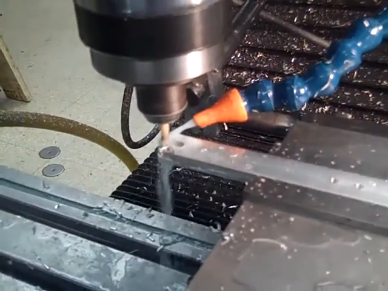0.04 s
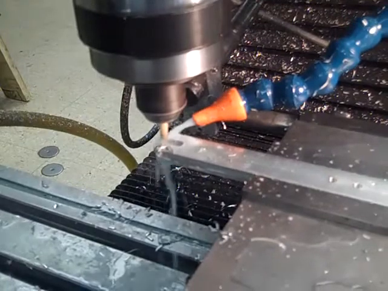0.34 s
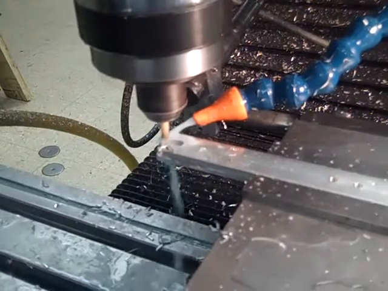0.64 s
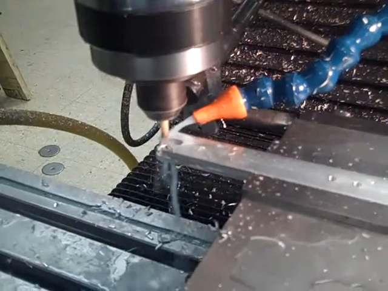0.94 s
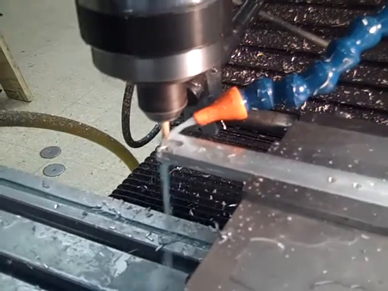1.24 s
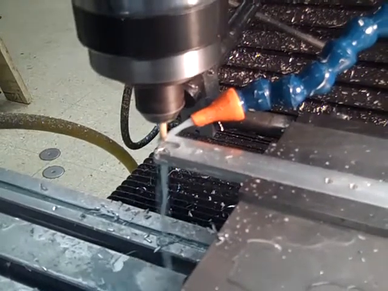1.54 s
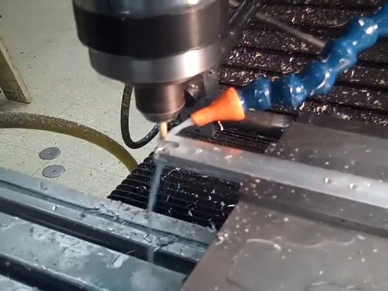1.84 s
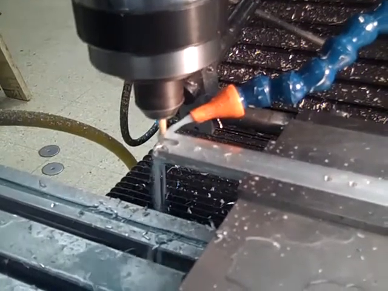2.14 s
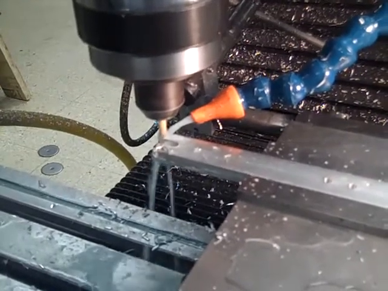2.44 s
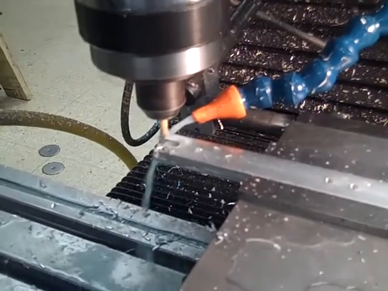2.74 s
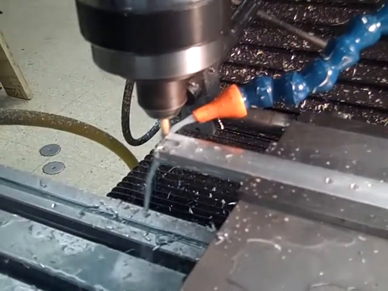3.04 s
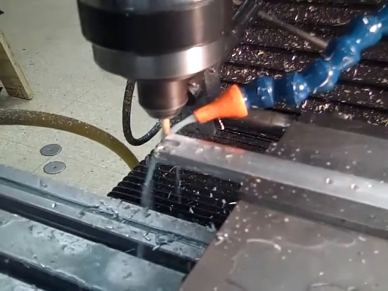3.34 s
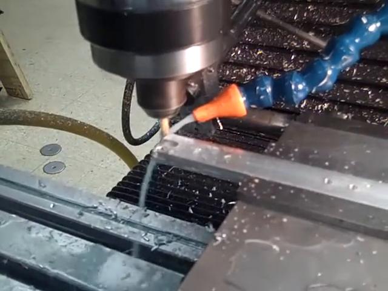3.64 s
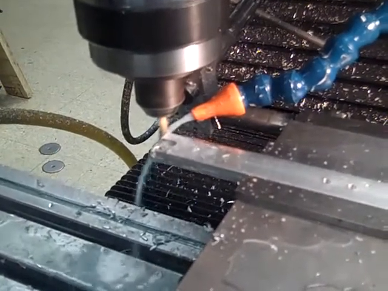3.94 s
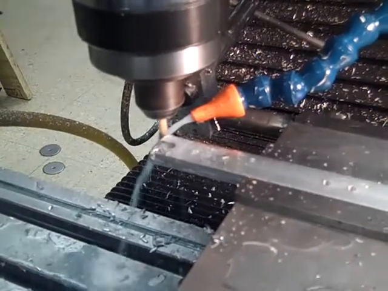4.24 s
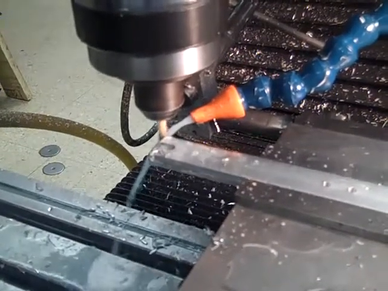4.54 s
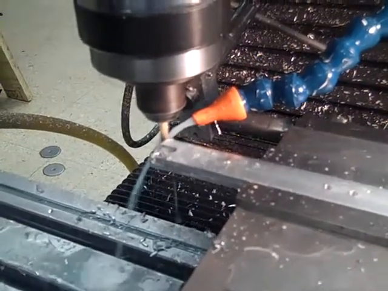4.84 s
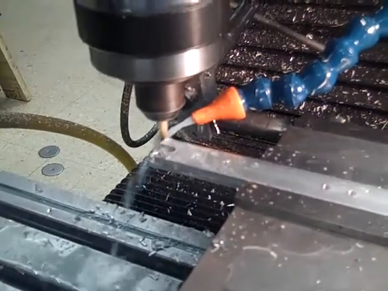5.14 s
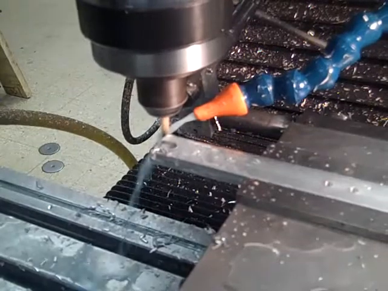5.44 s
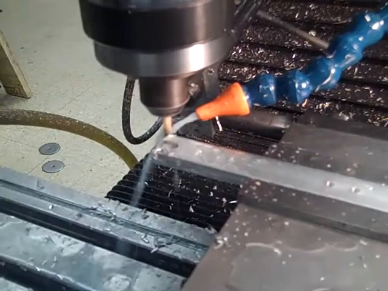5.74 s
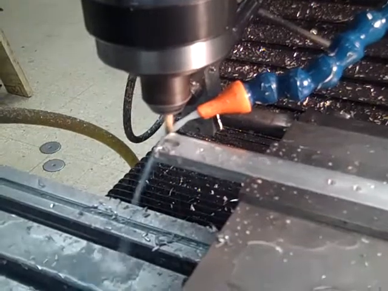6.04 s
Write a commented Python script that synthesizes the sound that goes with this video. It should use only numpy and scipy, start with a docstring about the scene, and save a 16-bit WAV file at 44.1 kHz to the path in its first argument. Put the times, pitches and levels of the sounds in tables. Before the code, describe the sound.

From the start, a milling machine is heard close by, cutting a metal bar. The cutter makes a rapid, chattering stream of very short, shrill squeaks, uneven in strength, with sharper ones poking out. A coolant jet gives a constant high hiss with a fine spatter. Beneath it the drive rumbles and hums, with a mid-pitched whine that throbs quickly and swells gently.

The squeaking is strong in the first half second, eases briefly near 0.9 and 2.3 seconds, and has another strong run from about 3.5 to 4.1 seconds. The machine noise dips slightly under the loudest squeaks and rises in each lull. Between about 4.2 and 4.6 seconds the squeaks fade out as the cutter runs clear. Hiss, rumble and whine continue steadily until the end at about 6 seconds. Squeaks and hiss have a short, tight echo and are brighter on the left.

```python
"""A milling machine cuts an aluminium bar with a two-flute cutter under a jet of coolant.
The flutes (cutting edges) squeak as they bite, once or twice a turn, and run clear after four seconds.
The jet hisses on the spinning tool; the drive rumbles and whines, throbbing with each lap of its belt.
The squeaks push an automatic volume control down, so the steady machine swells whenever the cut eases."""
import sys
import numpy as np
from scipy import signal
from scipy.fft import rfft, irfft, next_fast_len
from scipy.io import wavfile
from scipy.ndimage import uniform_filter1d

SR = 44100
rng = np.random.default_rng(int(sys.argv[2]) if len(sys.argv) > 2 else 0)


def generate_wav(signal):
    """Clip the signal to [-1, 1] and save it as 16-bit WAV at the path in sys.argv[1]."""
    frames = np.transpose(np.atleast_2d(signal))
    scaled = np.clip(frames, -1, 1) * 32767
    pcm = np.round(scaled).astype(np.int16)
    wavfile.write(sys.argv[1], SR, pcm)


N = 267687
TIME = np.arange(N) / SR
SPINDLE_HZ, BELT_HZ = 42.51, 15.163   # cutter turns and belt laps per second
FIRST_BITE_S, FIRST_THROB_S = .004, .0352

# Levels in the tables are relative, not final loudness.
# how hard the leading flute bites; it eases in short lulls, then runs clear: time_s, level_db
LEADING_FLUTE = [(0, -7.5), (0.1, -4.5), (0.25, -7), (0.53, -9), (0.86, -17), (0.96, -8.5), (1.3, -7),
                 (1.62, -6), (1.71, -10), (1.84, -7.5), (2.14, -6), (2.35, -13), (2.5, -7), (3.04, -7.5),
                 (3.14, -10), (3.32, -5), (3.62, -10.5), (3.8, -8.5), (4.08, -9.5), (4.2, -21), (4.6, -28)]
# the trailing flute takes a thinner chip until near the end of the bar: time_s, level_db
TRAILING_FLUTE = [(0, -12), (0.9, -17), (1.2, -11.5), (1.4, -18), (2.7, -11), (3.39, -17), (3.49, -3),
                  (3.7, -13), (4.05, -7), (4.25, -21), (4.36, -11), (4.6, -26)]
# the loudest squeaks, where a chip snags on a flute: time_s, level_db, pitch_hz
CHIP_SNAGS = [(0.051, -5, 6350), (0.0748, 1, 6450), (0.0983, 0, 6400), (0.168, -1.5, 6560),
              (0.192, 1.5, 6300), (0.333, 0.5, 6570), (0.3935, -3, 5880), (0.522, -2, 6460),
              (0.545, -2, 6530), (0.9214, -4.5, 6500), (0.945, -8.5, 6510), (1.18, -4.5, 6280),
              (1.2266, -1.5, 6440), (1.6273, -1, 6500), (1.8385, -1, 6580), (1.98, -3, 6300),
              (2.027, -2, 6570), (2.1208, -2, 6560), (2.497, -3.5, 6340), (2.5685, -3.5, 6300),
              (2.6145, 0.5, 6370), (3.474, -1.5, 6400), (3.5448, -1.5, 6200), (3.7435, -2, 6350),
              (3.7668, 0, 6440), (3.7915, -1, 6430), (3.8135, 0.5, 6600), (3.8368, -4.5, 6480),
              (3.908, -4.5, 6480), (4.004, 2, 6600), (4.014, -1.5, 6420), (4.1079, -4.5, 6270)]
# force of the jet on the tool, heard as hiss: time_s, level_db
JET_FORCE = [(0, -17), (0.25, -16.5), (0.85, -17), (2.25, -16), (3.2, -15.5), (3.7, -16), (4.4, -17),
             (6.07, -17.5)]
# tone colour of the jet: frequency_hz, level_db
JET_SPECTRUM = [(700, -29), (2300, -48), (4000, -22.5), (4800, -18), (5700, -12), (6500, -6.5),
                (6850, -8.5), (7150, -1.5), (7700, 1.5), (8100, -2), (8700, -9.5), (9500, -13.5),
                (10400, -20.5), (14000, -31)]
# ringing of tool holder, vice and guards under the jet: pitch_hz, width_hz, gain_db
METAL_RINGS = [(2950, 200, -11), (3630, 78, 7), (5000, 25, 9.5), (5350, 190, 4.5), (5600, 60, 4),
               (6985, 30, 6.5), (7540, 50, 1.5), (7940, 48, -0.5)]
# tone colour of the drive's noise: frequency_hz, level_db
RUMBLE_SPECTRUM = [(25, -40), (45, -17), (80, -16.5), (125, -2), (175, -1.5), (290, -3.5), (400, -1.5),
                   (520, -4), (700, -6), (880, -1), (1060, -4), (1260, -2), (1340, -12), (1600, -7.5),
                   (2300, -13.5), (3000, -9.5), (4500, -12.5), (7000, -23)]
# steady tones of motor, pump and bearings, and lines beside the whine spaced by whole belt laps: pitch_hz,
# level_db
HUM_TONES = [(91, -50.5), (121, -51.5), (136.6, -45), (168.3, -41), (212.3, -47), (227.4, -48.5),
             (382.3, -50.5), (401, -38.5), (808, -43), (849.8, -47.5), (879.7, -45), (894.5, -48),
             (940.1, -41.5), (1046.3, -41), (1076.7, -44.5), (1137.3, -46.5), (1241, -42), (1276.2, -44.5),
             (1399, -41), (1516.3, -50.5), (1636.9, -60), (3467.7, -49.5), (3618, -45), (3634, -41.5)]
# the whine swells as belt and pulleys drift in and out of step: rate_hz, first_peak_s, depth_db
BELT_SWELLS = [(0.565, 0.24, 2.0), (2.98, 0.18, 1.2)]
# the right microphone opening is shaded from the treble: frequency_hz, gain_db
RIGHT_SHADING = [(4500, -0.5), (6000, 0.5), (6800, 2.5), (7100, -10), (7700, -17), (9500, -14),
                 (11000, -18.5), (14000, -27)]


def from_db(db):
    """Turn decibels into a multiplier."""
    return 10 ** (np.asarray(db) / 20)


def rms_one(x):
    """Scale a signal to an average (rms) level of 1."""
    return x / np.sqrt(np.mean(x ** 2) + 1e-20)


def coloured(x, spectrum):
    """Shape lows and highs by rows of frequency_hz, gain_db."""
    size = next_fast_len(N + 2048)
    hz, db = np.transpose(spectrum)
    log_hz = np.log(np.fft.rfftfreq(size, 1 / SR) + 1)
    gain = from_db(np.interp(log_hz, np.log(hz), db))
    return irfft(rfft(x, size) * gain, size)[..., :N]


def drift(rate_hz):
    """A smooth random wobble, about 1 in size."""
    step = 40   # samples per random value
    pole = np.exp(-2 * np.pi * rate_hz * step / SR)
    noise = rng.standard_normal(N // step + 2002)
    slow = signal.lfilter([1], [1, -2 * pole, pole * pole], noise)[2000:]
    return np.interp(np.arange(N) / step, np.arange(len(slow)), rms_one(slow))


def bump(u):
    """A smooth swell of height 1 and length about 1."""
    return 1 / np.cosh(2 * np.clip(u, -20, 20))


def wall_echo(x, fade_s, echo_db):
    """The metal walls throw back a short, dense echo, different on each side."""
    t = TIME[:SR // 4]
    tail = rng.standard_normal((2, len(t))) * from_db(-60 * t / fade_s) * (t > .002)
    tail /= np.sqrt(np.sum(tail ** 2, axis=1, keepdims=True))
    echo = signal.fftconvolve(np.broadcast_to(x, (2, N)), tail, axes=1)[:, :N]
    return x + from_db(echo_db) * echo


def bites(load, turn_share, spread_db, jitter_s=.0007, pitch_hz=6510, scatter_hz=150, length_s=.002016):
    """One flute bites once a turn, as hard as its load. Rows: time_s, level_db, pitch_hz, length_s."""
    times = np.arange(FIRST_BITE_S + turn_share / SPINDLE_HZ, load[-1][0], 1 / SPINDLE_HZ)
    late, harder, higher = rng.uniform(-1, 1, (len(times), 3)).T
    levels = np.interp(times, *np.transpose(load)) + spread_db * harder
    pitches = pitch_hz + scatter_hz * higher
    rows = np.column_stack([times + jitter_s * late, levels, pitches, np.full(len(times), length_s)])
    nearest_snag_s = np.abs(times[:, None] - np.array(CHIP_SNAGS)[:, 0]).min(axis=1)
    return rows[nearest_snag_s > .004]   # a snag takes the place of a bite


def squeak(t, middle_hz, length_s, fall_hz, fall_s=.0013):
    """The chip squeaks over the flute, falling in pitch as it thickens."""
    pitch = middle_hz - fall_hz * np.tanh(t / fall_s)
    phase = rng.uniform(0, 2 * np.pi) + 2 * np.pi * np.cumsum(pitch) / SR
    return np.sin(phase) * bump(t / length_s)


def cutting(snag_s=.001428, ring_hz=6612, ring_db=-6.5, ring_lag_s=.002, ring_s=.0041):
    """Every bite squeaks in its own way; the cutter springs back and rings at its own pitch."""
    leading = bites(LEADING_FLUTE, turn_share=0, spread_db=6.0)
    trailing = bites(TRAILING_FLUTE, turn_share=.5, spread_db=3.5)
    snags = [(*snag, snag_s) for snag in CHIP_SNAGS]
    chips, swing = np.zeros(N), np.zeros(N)
    for time_s, db, hz, length_s in np.vstack([snags, leading, trailing]):
        middle = int(time_s * SR)
        near = slice(max(middle - 600, 0), middle + 600)
        t = TIME[near] - time_s
        steepness, spring = rng.uniform(.3, 1.4, 2)
        chips[near] += from_db(db) * squeak(t, hz, length_s, fall_hz=720 * steepness)
        swing[near] += from_db(db + ring_db) * spring * bump((t - ring_lag_s) / ring_s)
    ring = swing * np.sin(2 * np.pi * ring_hz * TIME + drift(4.7))
    torn = (chips + ring) * (1 + .14 * drift(400))   # the chip tears unevenly
    in_air = coloured(torn, [(4700, 29), (5550, 2), (8000, -3), (10000, -20)])
    return wall_echo(in_air, fade_s=.09, echo_db=-10)


def coolant_jet(boost_db=3.5, chop_db=.5, chop_lead_s=.0013, spatter_db=1.25, repeat_db=-12):
    """The jet hisses and spatters on the tool; each flute chops it just before biting."""
    chop = np.cos(4 * np.pi * SPINDLE_HZ * (TIME - FIRST_BITE_S + chop_lead_s))
    one_turn = rng.standard_normal((2, round(SR / SPINDLE_HZ)))
    every_turn = one_turn[:, np.arange(N) % one_turn.shape[1]]   # part of the rush repeats
    rush = rng.standard_normal((2, N)) + from_db(repeat_db) * every_turn
    rush *= from_db(chop_db * chop + spatter_db * drift(270))
    hiss = coloured(wall_echo(rush, fade_s=.11, echo_db=-6.5), JET_SPECTRUM)
    for hz, width_hz, gain_db in METAL_RINGS:
        band = signal.lfilter(*signal.iirpeak(hz, hz / width_hz, fs=SR), hiss)
        hiss += (from_db(gain_db) - 1) * band
    force_db = np.interp(TIME, *np.transpose(JET_FORCE))
    return from_db(force_db + boost_db) * rms_one(hiss)


def drive_rumble(level_db=-22.5, rattle_db=-7):
    """Bearings and pump churn; the belt repeats its own rattle every lap."""
    one_lap = rng.standard_normal(round(SR / BELT_HZ))
    churn = rng.standard_normal(N) + from_db(rattle_db) * np.resize(one_lap, N)
    side = coloured(rng.standard_normal(N), [(30, -12), (120, -27), (600, -18), (1200, -13), (3000, -12)])
    stereo = churn + side * [[1], [-1]]   # opposite signs widen the sound
    return from_db(level_db) * rms_one(coloured(stereo, RUMBLE_SPECTRUM))


def drive_hum(boost_db=1.36, waver_db=3):
    """Motor, pump and bearings hum, and lines flank the belt whine, in tones that each waver a little."""
    hum = np.zeros(N)
    for hz, db in HUM_TONES:
        phase = 2 * np.pi * hz * TIME + rng.uniform(0, 2 * np.pi) + .35 * drift(2.4)
        hum += from_db(db + boost_db + waver_db * drift(13.8)) * np.sin(phase)
    return np.sqrt(2) * hum


def belt_whine(level_db=-25, pitch_hz=970.5, throb=.9, stretch_hz=2.8, uneven_db=1.27):
    """The belt's teeth mesh in a tone that gets louder and higher once a lap, where the belt runs tight."""
    tightness = np.cos(2 * np.pi * BELT_HZ * (TIME - FIRST_THROB_S))
    pitch = pitch_hz + stretch_hz * tightness
    tone = np.sin(2 * np.pi * np.cumsum(pitch) / SR + .37 * drift(30))
    throbbing = tone * (1 + throb * tightness) * from_db(uneven_db * drift(37))
    swell_db = sum(db * np.cos(2 * np.pi * hz * (TIME - peak_s)) for hz, peak_s, db in BELT_SWELLS)
    return from_db(level_db + swell_db) * rms_one(throbbing)


def volume_control(x, threshold_db=-12, squeeze=.8, release_db_per_s=64, attack_s=.065, boost_db=.69):
    """Loud squeaks turn the whole sound down; it swells back in every lull."""
    power = uniform_filter1d(np.mean(x ** 2, axis=0), size=40)
    excess_db = np.maximum(10 * np.log10(np.abs(power) + 1e-12) - threshold_db, 0)
    fall_db = release_db_per_s * TIME
    held_db = np.maximum.accumulate(excess_db + fall_db) - fall_db   # each peak sinks slowly
    pole = np.exp(-1 / (attack_s * SR))
    smooth_db = signal.lfilter([1 - pole], [1, -pole], held_db)
    return x * from_db(boost_db - squeeze * smooth_db)


def scene():
    """The steady drive fills the middle; cut and jet spread to both sides."""
    drive = drive_rumble() + drive_hum() + belt_whine()
    return drive + cutting() + coolant_jet()


def record(dry):
    """The right side is duller; the volume is controlled, peaks are clipped and the top treble is cut."""
    stereo = np.stack([dry[0], coloured(dry[1], RIGHT_SHADING)])
    clipped = np.clip(volume_control(stereo), -1, 1)
    treble_cut = signal.ellip(12, .1, 90, 14050, fs=SR, output="sos")   # above 14050 Hz
    return signal.sosfilt(treble_cut, clipped)


dry = scene()
out = record(dry)
generate_wav(out)
```